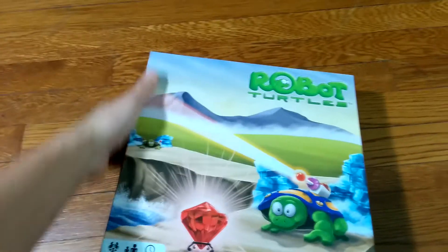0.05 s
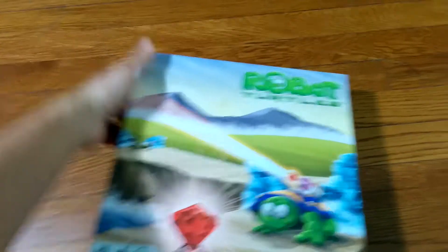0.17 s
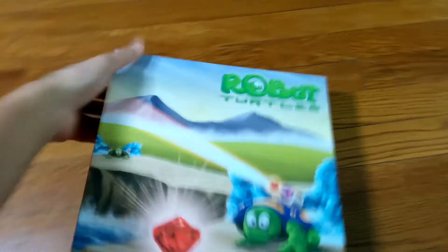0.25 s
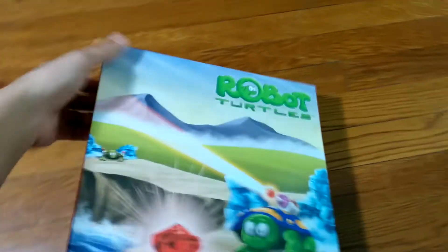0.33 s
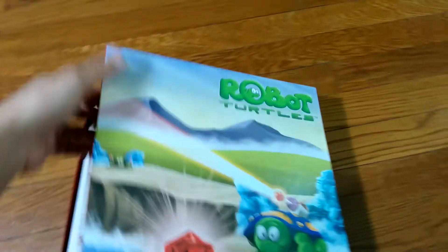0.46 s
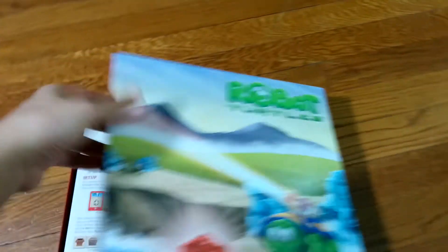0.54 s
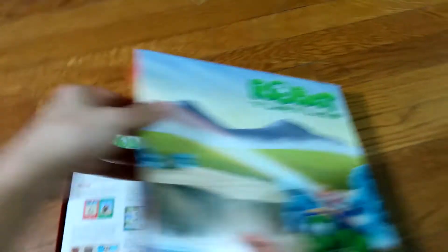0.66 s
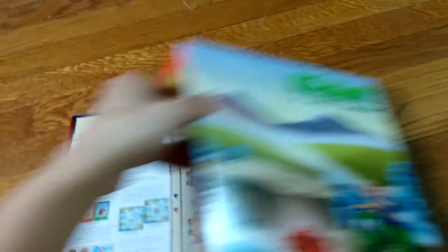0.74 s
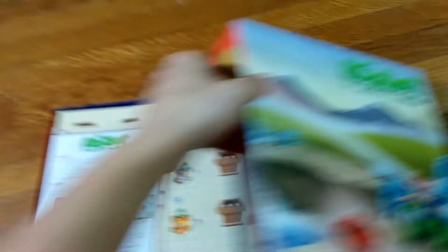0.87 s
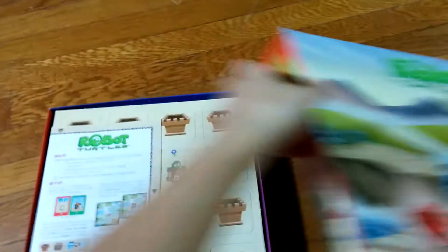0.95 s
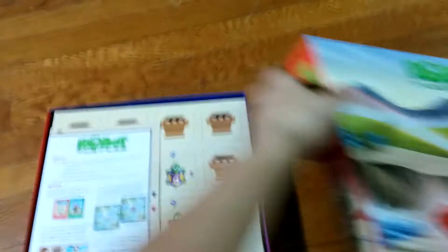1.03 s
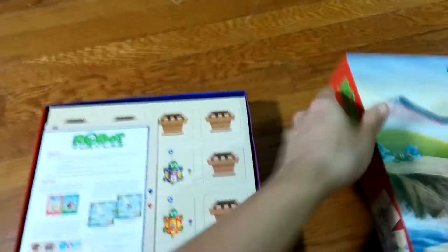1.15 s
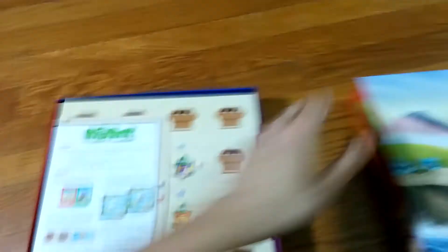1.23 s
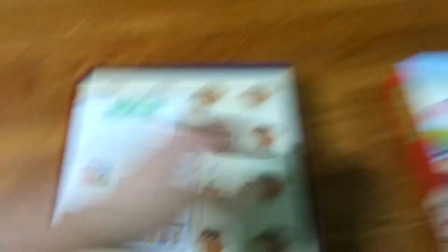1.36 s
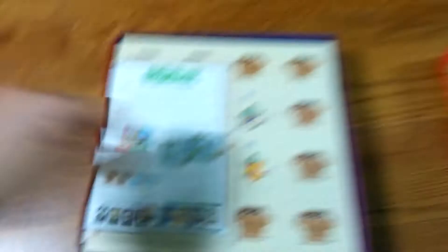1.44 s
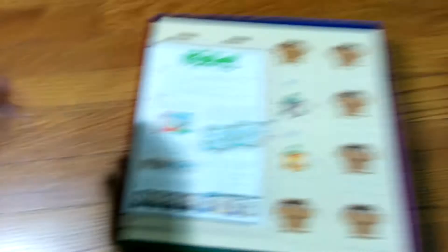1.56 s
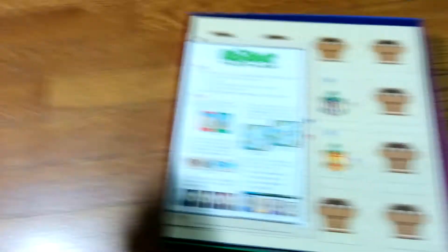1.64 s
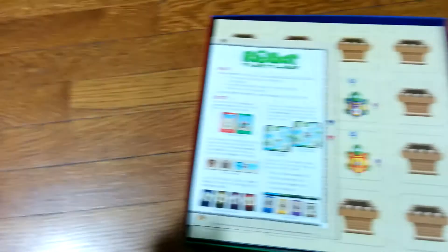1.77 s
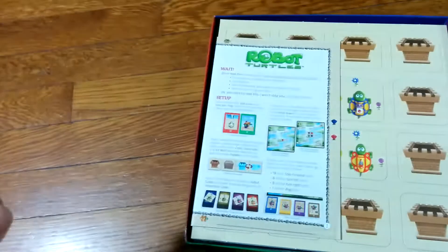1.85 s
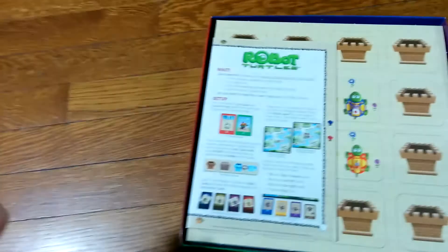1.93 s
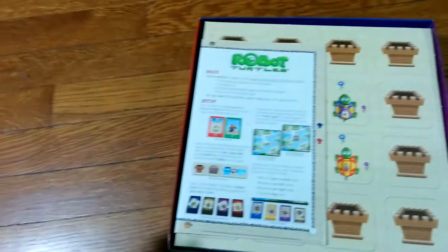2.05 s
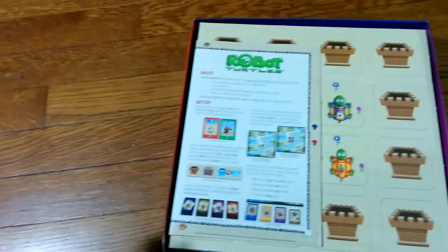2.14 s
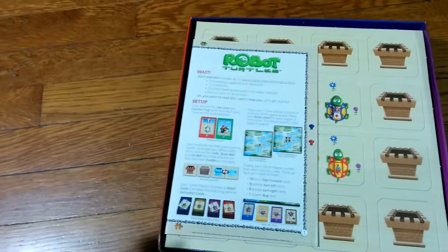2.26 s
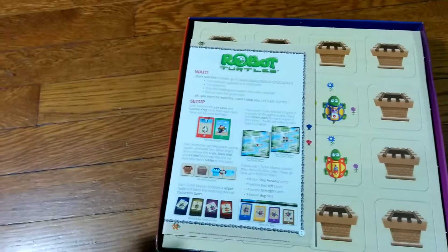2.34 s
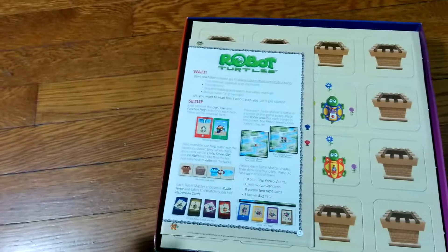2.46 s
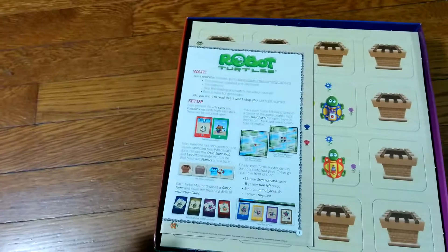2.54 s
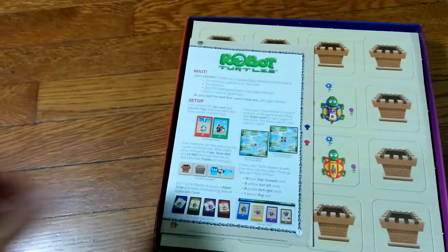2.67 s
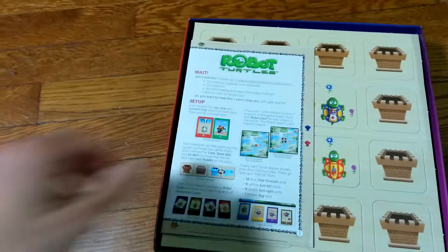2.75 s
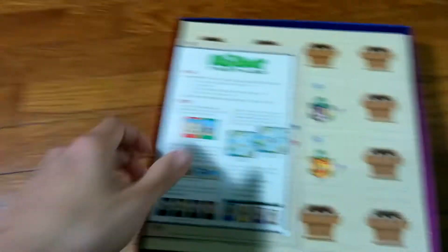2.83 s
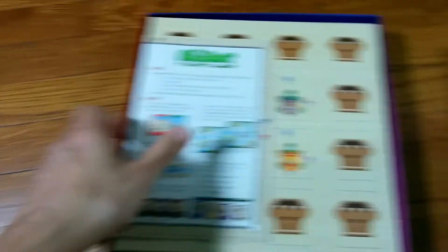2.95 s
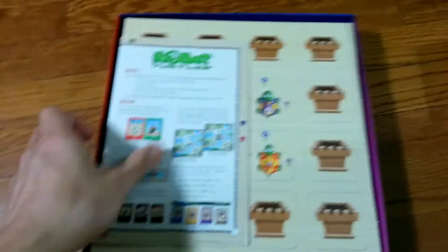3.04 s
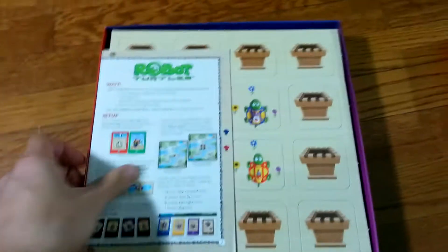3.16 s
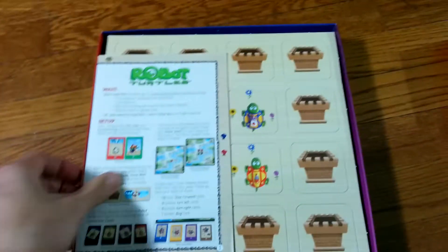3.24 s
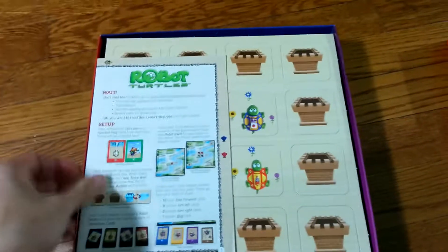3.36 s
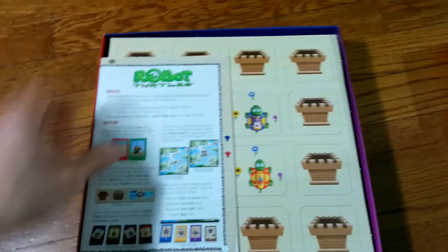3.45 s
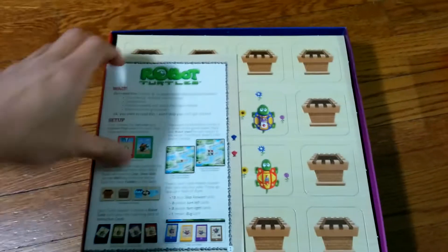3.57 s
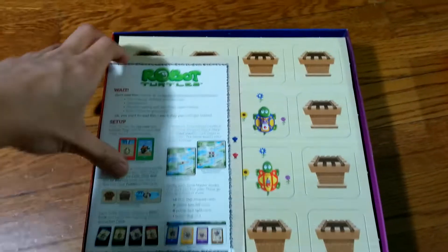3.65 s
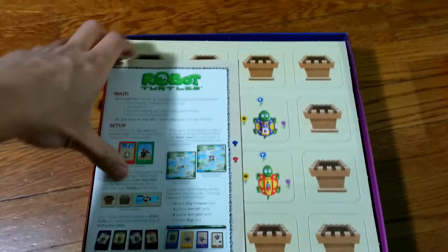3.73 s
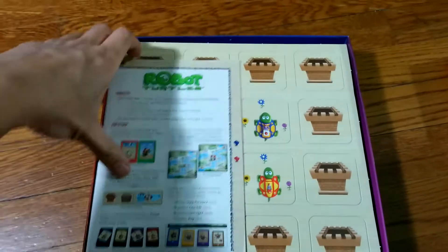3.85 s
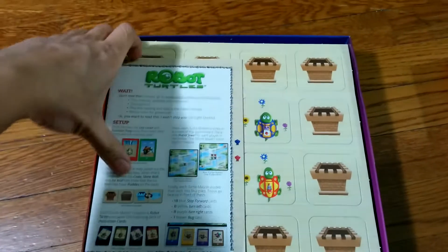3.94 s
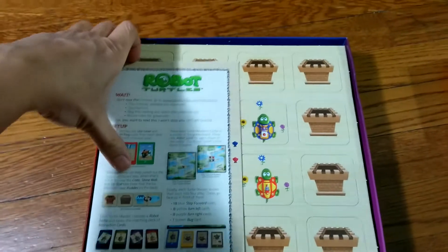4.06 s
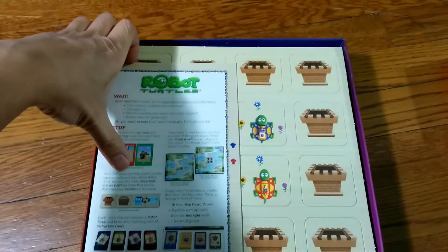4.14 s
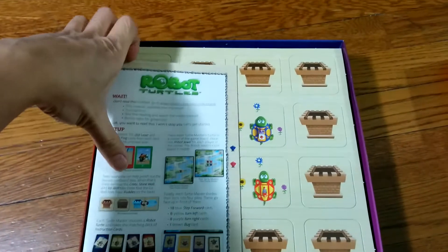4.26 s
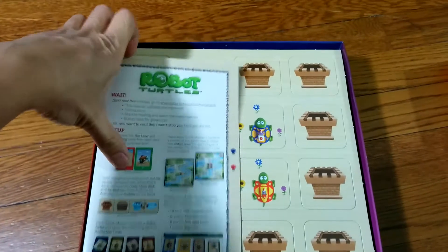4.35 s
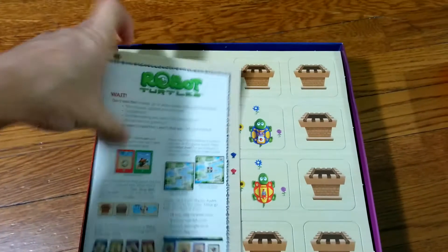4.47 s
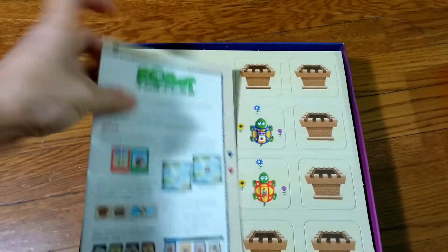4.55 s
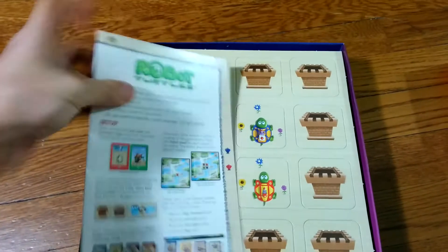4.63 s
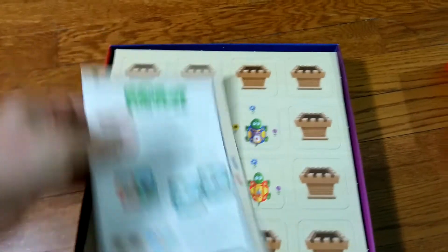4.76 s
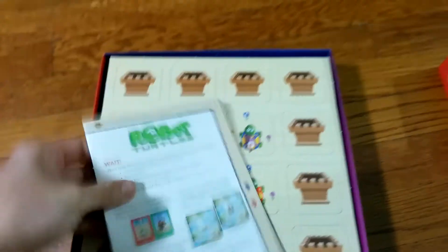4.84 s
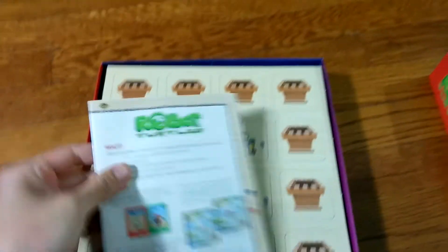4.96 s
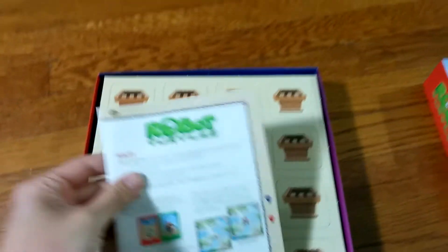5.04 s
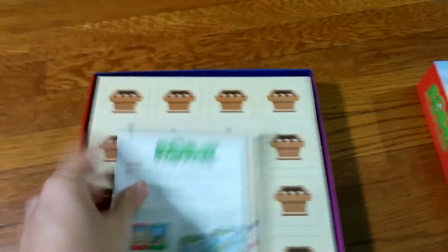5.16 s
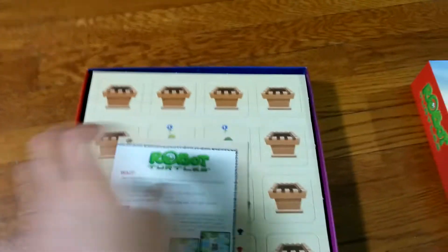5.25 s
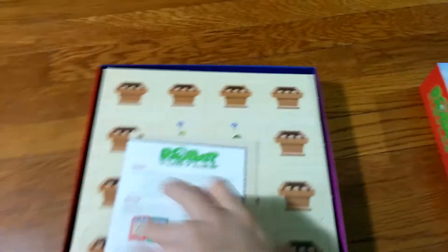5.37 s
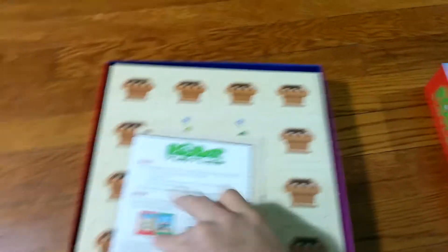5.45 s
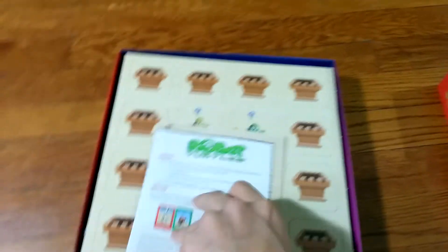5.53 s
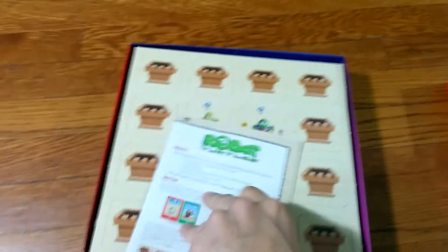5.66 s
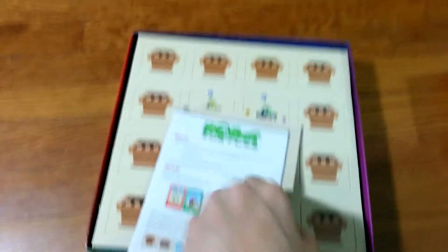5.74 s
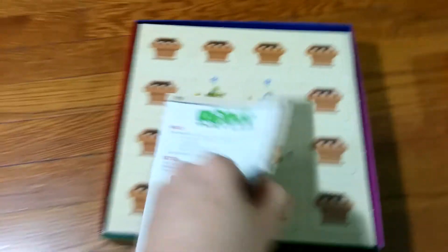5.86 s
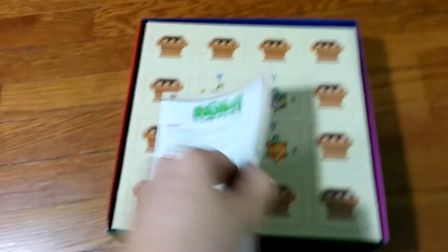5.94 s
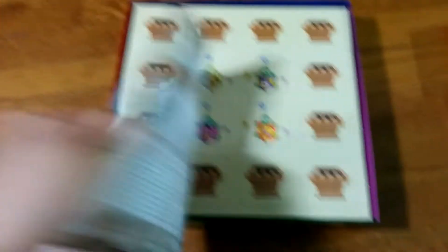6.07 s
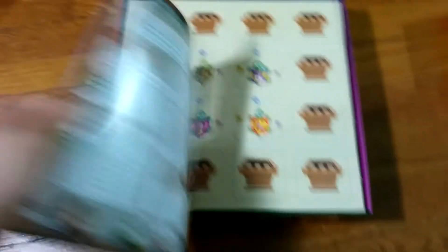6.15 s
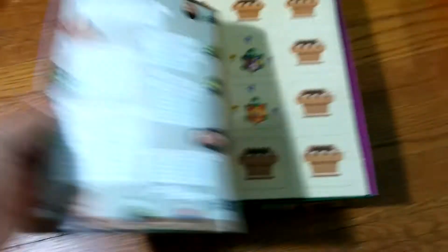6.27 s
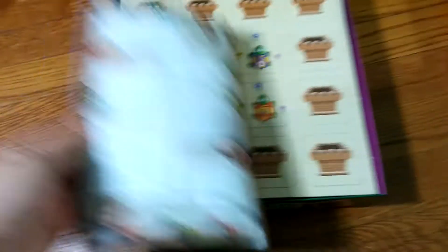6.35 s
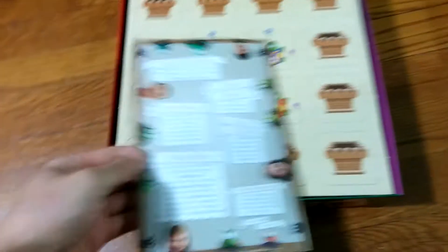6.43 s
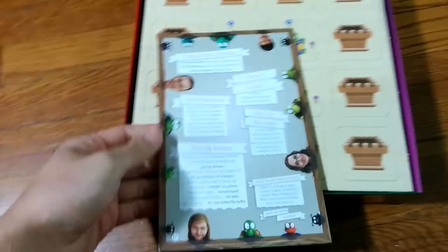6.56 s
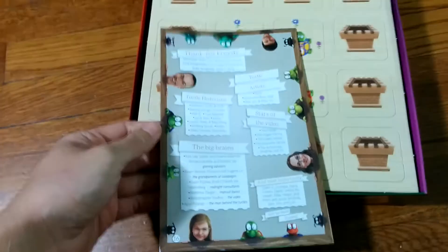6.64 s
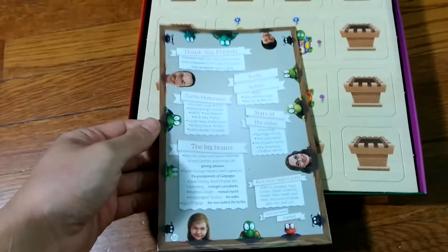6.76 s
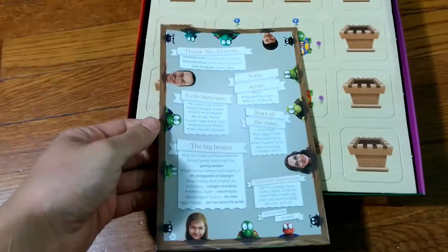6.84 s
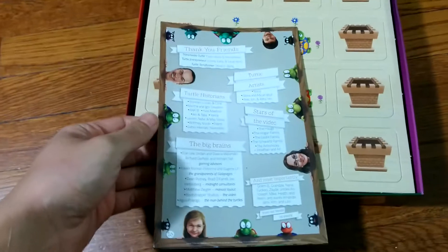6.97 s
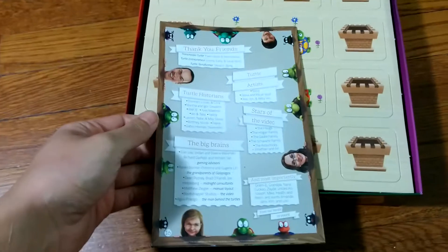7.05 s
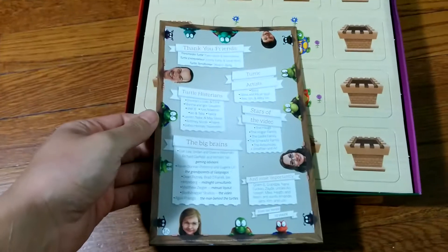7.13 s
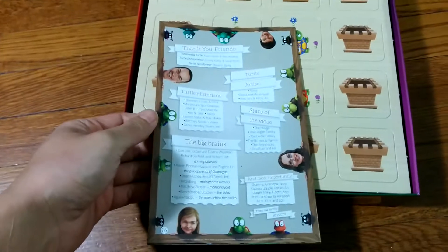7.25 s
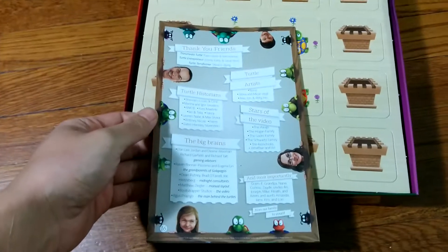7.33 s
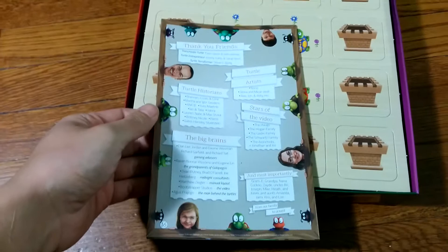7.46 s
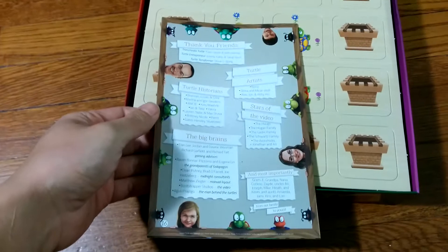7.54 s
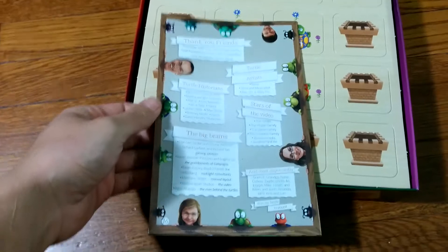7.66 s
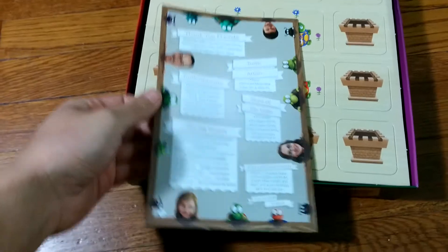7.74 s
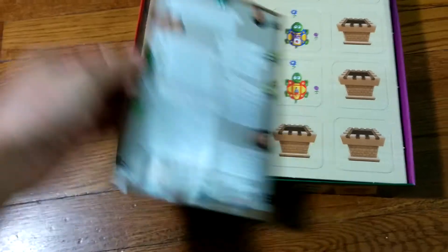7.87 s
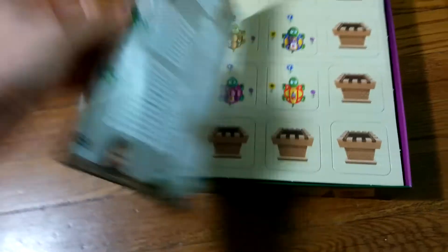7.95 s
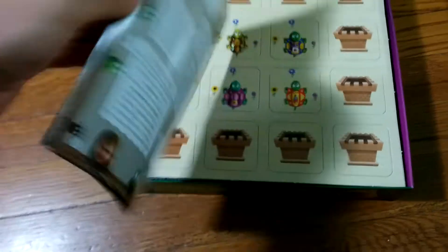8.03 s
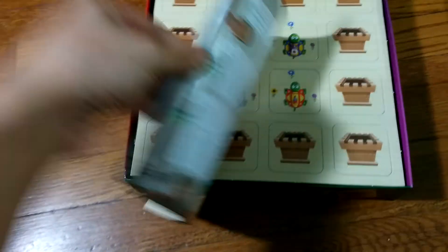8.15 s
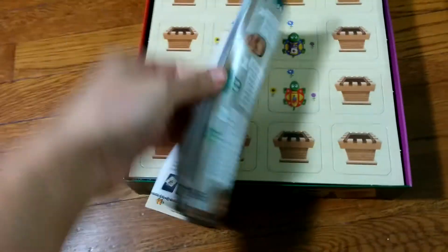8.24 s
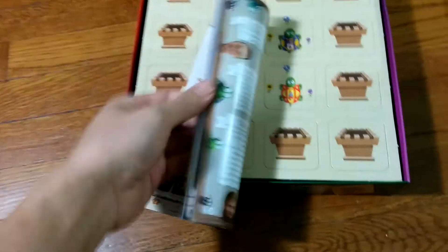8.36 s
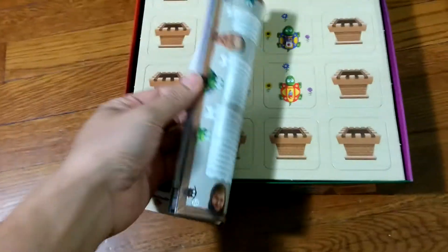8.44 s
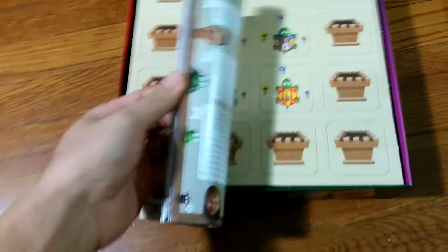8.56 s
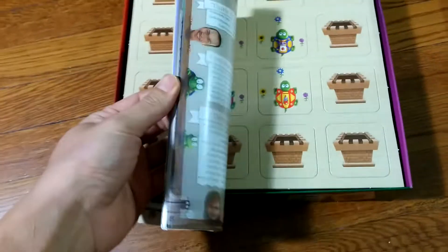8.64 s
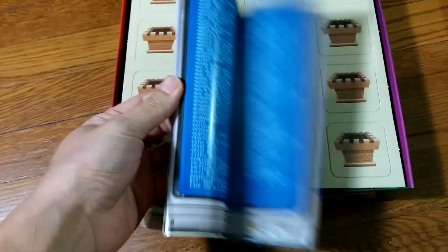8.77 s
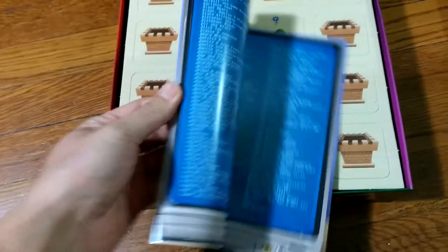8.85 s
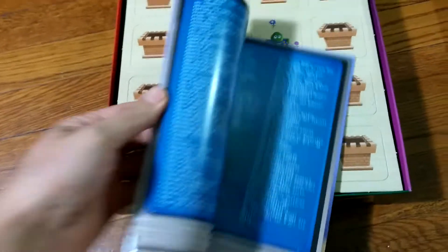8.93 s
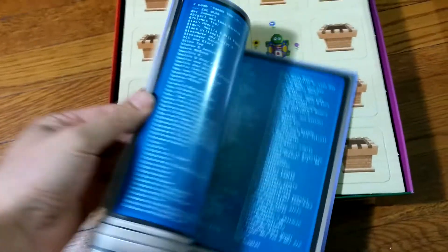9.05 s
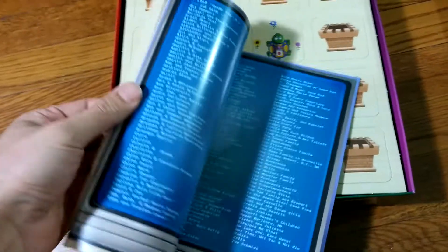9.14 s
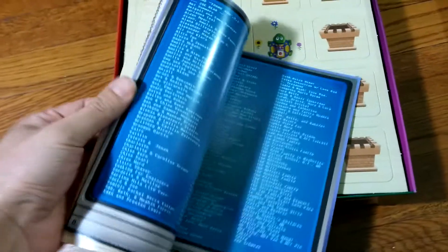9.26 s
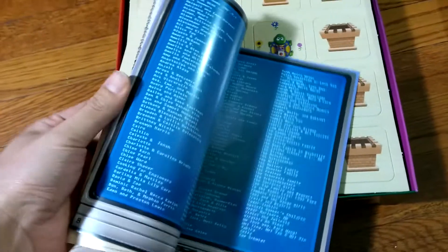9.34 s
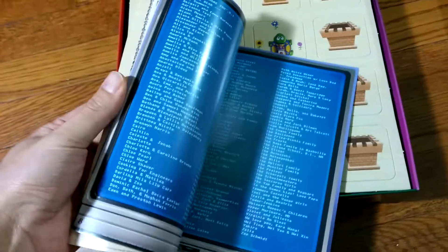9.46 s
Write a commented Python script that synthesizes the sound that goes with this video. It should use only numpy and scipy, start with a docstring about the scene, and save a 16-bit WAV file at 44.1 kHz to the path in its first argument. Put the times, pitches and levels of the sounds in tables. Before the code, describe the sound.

Hollow cardboard scraping and knocking, a burst of lid clatter, then light paper rustles, snaps and page flicks in a small quiet room.

```python
"""The lid of a cardboard game box scrapes off and clatters down on a wooden floor, in a small room.
Fingers knock on the boards inside; a glossy booklet is slid out, turned over and leafed through. Clothing swishes.
Knocks are noise cracks with ringing tones, rubbing is tiny clicks over hiss shaped by each stroke,
and singing card is a tone shaken by noise. Below lie a low noise rumble, a far gliding drone and a thin hiss."""
import sys
import numpy as np
from scipy import signal
from scipy.fft import rfft, irfft, next_fast_len
from scipy.io import wavfile
from scipy.ndimage import uniform_filter1d

SR = 44100
rng = np.random.default_rng(int(sys.argv[2]) if len(sys.argv) > 2 else 0)


def materialize(psi):
    """Save the field psi as 16-bit PCM at rate SR to the path in sys.argv[1].

    A 1-D psi becomes a single channel; in a 2-D psi each row is a channel.
    """
    bounded = np.clip(np.atleast_2d(psi).T, -1, 1)
    quanta = np.round(bounded * 32767).astype(np.int16)
    wavfile.write(sys.argv[1], SR, quanta)


N = 418950  # length in samples
T = np.arange(N) / SR  # time in seconds
TOP_HZ = 15900  # upper limit of the sound
STROKE_CURVE = 1.135  # exponent of a stroke's swell: higher is more pointed


def undb(db):
    """Turn decibels into gain."""
    return 10 ** (np.asarray(db) / 20)


def unit(x):
    """Scale to an rms level of 1."""
    return x / np.sqrt(np.mean(x ** 2))


def band(x, low_hz, high_hz, order=3):
    """Keep only the pitches between two edges, using no future samples."""
    edges = [low_hz, min(high_hz, .49 * SR)]
    return signal.sosfilt(signal.butter(order, edges, "band", fs=SR, output="sos"), x)


def colour(x, points):
    """Shape the spectrum of x with (pitch_hz, level_db) points, then scale to rms 1."""
    hz, db = np.transpose(points)
    f = np.maximum(np.fft.rfftfreq(len(x), 1 / SR), 1)
    gain = undb(np.interp(np.log(f), np.log(hz), db))
    return unit(irfft(rfft(x) * gain, len(x)))


def walk(rate_hz):
    """Wander smoothly and at random, with an rms of 1."""
    k = int(SR / rate_hz)
    steps = np.repeat(rng.standard_normal(N // k + 1), k)
    return unit(uniform_filter1d(steps, k)[:N])


def add(out, start_s, x):
    """Mix x into out at a given time."""
    i = max(int(start_s * SR), 0)
    out[i:i + len(x)] += x[:N - i]


def swell(length_s, rise):
    """A hand speeds up for a share of its stroke, then slows to rest."""
    rise = np.clip(rise, .03, .97)
    progress = np.linspace(0, 1, int(length_s * SR))
    speed = np.sin(np.pi / 2 * np.interp(progress, [0, rise, 1], [0, 1, 0]))
    return speed ** STROKE_CURVE


def friction(spectrum, catch_rate, catch_spread_db, smooth_db, uneven_db):
    """Fibres catch and let go as tiny clicks over a smooth hiss; the pressure is uneven."""
    happens = rng.random(N) < catch_rate / SR  # catch_rate is clicks per second
    sign = rng.choice([-1, 1], N)
    strength = undb(catch_spread_db * np.minimum(rng.exponential(size=N), 4))
    catches = unit(happens * sign * strength)
    hiss = undb(smooth_db) * rng.standard_normal(N)
    pressure = undb(uneven_db * walk(70))
    return colour((catches + hiss) * pressure, spectrum)


def grip(x, depth_db, spacing_hz):
    """Every new grip bends the sheet and gives it other resonances."""
    size = next_fast_len(len(x))
    f = np.fft.rfftfreq(size, 1 / SR)
    centres = spacing_hz * np.arange(200) ** 1.2  # further apart towards the treble
    heights = np.clip(rng.standard_normal(len(centres)), -2, 2)
    gain = undb(depth_db * np.interp(f, centres, heights))
    return irfft(rfft(x, size) * unit(gain), size)[:len(x)]


def rub(strokes, grain, split_hz, low_db, high_db, resonance_db, spacing_hz, treble_power=1.21):
    """Each stroke swells and fades; the bright hiss follows its speed more steeply than the low tones."""
    low = signal.sosfiltfilt(signal.butter(2, split_hz, fs=SR, output="sos"), grain)
    bass = undb(low_db) * unit(low)
    treble = undb(high_db) * unit(grain - low)
    out = np.zeros(N)
    for start_s, length_s, rise, level_db, bright_db in strokes:
        speed = swell(length_s, rise)
        now = (int(start_s * SR) + np.arange(len(speed))) % N
        stroke = speed * bass[now] + undb(bright_db) * speed ** treble_power * treble[now]
        add(out, start_s, undb(level_db) * grip(stroke, resonance_db, spacing_hz))
    return out


# Ranges of pitch in a blow, from low to high: thump, body, clack, snap
# columns: low_edge_hz, high_edge_hz
REGISTERS = [(130, 420), (420, 1100), (1100, 2800), (2800, 15000)]


def tilt(x, register_db):
    """Steer the first 1/60 s of a blow towards a given level in each register, with no sound ahead of it."""
    f = np.maximum(np.fft.rfftfreq(len(x), 1 / SR), 1)
    centres = np.log(REGISTERS).mean(1)
    for _ in range(2):
        now = [np.std(band(x[:SR // 60], low, high)) for low, high in REGISTERS]
        # folding the cepstrum (spectrum of the log gain) keeps the filter from acting early
        cepstrum = irfft(np.interp(np.log(f), centres, np.log(undb(register_db) / now)))
        cepstrum[1:len(x) // 2] *= 2
        cepstrum[len(x) // 2:] = 0
        x = irfft(rfft(x) * np.exp(rfft(cepstrum)))
    return x


def blows(table, modes, crack_db, crack_t60, flutter_db, flutter_t60, treble_damping, body_db,
          soft_hz, bass_hz, thin_hz, db):
    """Each blow is a short crack, the sheet's main ringing tones, and a dense flutter of noise."""
    out, t = np.zeros(N), np.arange(2 ** 14) / SR
    hz, mode_db, t60 = np.transpose(modes)[:, :, None]
    height = np.arange(len(REGISTERS)) - (len(REGISTERS) - 1) / 2
    middle, body = np.where(np.abs(height) < 1, .5, -.5), height == -.5
    for start_s, level_db, bright_db, hollow_db, ring in table:
        # a held sheet dies sooner than a free one; t60 is the time to fall by 60 dB
        fade = -np.log(1000) * t / max(ring, .1)
        # every blow lands elsewhere on the sheet and meets the tones in other shares
        share, detune = rng.standard_normal((2, len(modes), 1))
        weight = np.sign(share) * undb(mode_db + 2 * np.abs(share))
        waves = np.sin(2 * np.pi * hz * (1 + 0.0037 * detune) * t)
        tone = (weight * np.exp(fade / t60) * waves).sum(0)
        crack = undb(crack_db) * np.exp(fade / crack_t60) * rng.standard_normal(len(t))
        flutter = np.zeros(len(t))
        for k, edges in enumerate(REGISTERS):
            # treble_damping above 1 makes higher registers die sooner, below 1 later
            decay = np.exp(fade * treble_damping ** k / flutter_t60)
            flutter += band(rng.standard_normal(len(t)), *edges) * decay
        # soft fibres round off the top
        blow = band(tone + crack + undb(flutter_db) * flutter, bass_hz, soft_hz, order=1)
        # a thin sheet radiates little deep bass
        blow = band(blow, thin_hz, TOP_HZ, order=2)
        # a hard contact is bright; a blow on a free panel is hollow
        register_db = bright_db * height + hollow_db * middle + body_db * body
        add(out, start_s, undb(db + level_db) * tilt(blow, register_db))
    return out


# Strokes of the lid along the box walls
# columns: start_s, length_s, rise (share of the length spent speeding up),
# level_db (before tone shaping), bright_db (extra treble against bass)
LID_STROKES = [(0, 0.44, 0.05, -39.5, -8), (.2, 0.37, 0.44, -38, -10.5), (.45, 0.36, 0.63, -36.5, -3),
               (.76, 0.29, 0.31, -42.5, 0), (1.03, 0.25, 0.18, -45.5, 2)]
# Sound colour of rubbing cardboard; columns: pitch_hz, level_db (relative)
LID_COLOUR = [(120, -4), (200, 3.5), (340, -10), (440, -3), (763, -11), (1020, -4.5), (1370, -12.5),
              (2090, -10), (3370, -10.5), (3830, -11), (5940, -17.5), (12400, -26.5), (16000, -27)]


def lid_scrape():
    """Cardboard fibres catch and slip as the lid rubs along the box."""
    grain = friction(LID_COLOUR, catch_rate=700, catch_spread_db=1.6, smooth_db=-1, uneven_db=1.7)
    return rub(LID_STROKES, grain, split_hz=1900, low_db=1.0, high_db=-2, resonance_db=3.5, spacing_hz=40.4)


# Slow drift of the rumble; columns: time_s, level_db (before waver and lulls)
RUMBLE = [(0, -27.5), (.2, -36.5), (1.05, -35.5), (1.3, -30), (1.9, -33.5), (3.2, -34.5), (3.65, -40),
          (4, -33), (4.5, -38), (4.8, -36.5), (5.35, -44), (6.05, -34.5), (6.8, -43), (7.45, -36),
          (8.2, -40.5), (9.5, -42.5)]
# Sound colour of the rumble before its core is evened out; columns: pitch_hz, level_db (relative)
RUMBLE_COLOUR = [(25, -28.5), (40, -32.5), (50, -8), (55, 1.5), (63, -3.5), (74, -18.5), (85, -12),
                 (98, -17), (120, -13.5), (135, -31.5), (150, -27.5), (250, -41), (400, -44.5), (1500, -92)]
# The rumble sinks briefly; columns: middle_s, length_s, depth_db
LULLS = [(3.59, 0.15, 3.5), (4.137, 0.075, 15), (4.307, 0.076, 13.5), (5.43, 0.12, 9.5), (6.92, 0.099, 26),
         (7.34, 0.19, 11), (7.598, 0.11, 7.5), (9.41, 0.044, 16)]
# Sound colour of the steady hiss; columns: pitch_hz, level_db (relative)
HISS_COLOUR = [(120, -0.5), (200, 4), (311, -2), (366, -4), (548, -3.5), (709, -6), (3970, -12),
               (14600, -15.5), (16000, -23.5)]


def background(rumble_db=0, hiss_db=-54, core_hz=80, waver_db=1.88, waver_rate_hz=18):
    """A narrow low rumble of noise wavers and now and then sinks, under a steady hiss."""
    low = colour(rng.standard_normal(N), RUMBLE_COLOUR)
    core = signal.sosfiltfilt(signal.butter(3, core_hz, fs=SR, output="sos"), low)
    # the deep core wanders in pitch while its strength holds
    window = SR // 25
    strength = np.sqrt(uniform_filter1d(uniform_filter1d(core ** 2, window), window))
    rumble = core / strength + low - core
    level_db = np.interp(T, *np.transpose(RUMBLE)) + waver_db * walk(waver_rate_hz)
    for middle_s, length_s, depth_db in LULLS:
        dip = signal.windows.tukey(int(length_s * SR), .7)
        add(level_db, middle_s - length_s / 2, -depth_db * dip)
    hiss = colour(rng.standard_normal(N), HISS_COLOUR)
    return undb(rumble_db + level_db) * rumble + undb(hiss_db) * hiss


# A faint far drone, probably an engine outside, climbs and fades
# columns: time_s, pitch_hz, level_db (before waver)
DRONE = [(0, 104, -47), (1, 109, -43.5), (1.6, 113, -37), (2, 123, -45), (2.8, 125, -44), (3.2, 129, -47.5),
         (3.7, 132, -53), (4.1, 132, -73)]


def drone(waver_db=2):
    """One low sine tone glides in pitch and wavers in level."""
    time_s, hz, db = np.transpose(DRONE)
    phase = 2 * np.pi * np.cumsum(np.interp(T, time_s, hz)) / SR
    return undb(np.interp(T, time_s, db) + waver_db * walk(14)) * np.sin(phase)


# The lid is tugged loose and dropped
# columns: start_s, level_db (before the layer's gain), bright_db (per register),
# hollow_db (middle registers over edges), ring (factor on ringing time, at least 0.1)
LID_KNOCKS = [(.004, -29, -6, -0.5, 0.57), (.123, -32, -3.5, 4, 0.45), (.268, -27, -1.5, 6, .95),
              (.287, -26, -5, -2, 0.92), (.315, -14, -4.5, 8.5, 0.55), (.336, -29.5, -12.5, 3, 0.61),
              (.369, -29.5, 1, 12.5, .35), (.493, -35, -4, 1, 1), (.601, -21, -6.2, 8.5, 0.44),
              (.643, -33.5, -14.5, 20.5, 0.76), (.659, -37, -6, 5, 1), (1.008, -32.5, -3.5, 1.5, 1),
              (1.033, -22, -3, 6, 0.59), (1.039, -29.5, -8, 6, 0.27), (1.153, -33.5, -5, 1.5, 0.44),
              (1.2015, -12.5, -5, 16.5, 0.35), (1.255, -12.5, -5, 6.5, 0.59), (1.281, -17, -9, 9, 0.59),
              (1.3, -16.5, -11, 6.5, 0.95), (1.32, -21, -5.5, 5, 0.94), (1.33, -28, -12, -2, 0.62),
              (1.345, -26, -8, 17, 0.54)]
# Ringing tones of the empty lid, before each blow varies them; columns: pitch_hz, level_db, t60_s
LID_MODES = [(198.1, -3.5, 0.32), (262, -5, 0.23), (364.3, 2, 0.29), (425, 0.5, 0.21), (482.6, 8, 0.17),
             (585, -7, 0.25), (600, -2.5, 0.15), (643, -4, 0.11), (709, -5.5, 0.27), (803, -12, 0.14),
             (880, -3, 0.2), (990, 0.5, 0.13), (1122, -4, 0.094), (1223, -9.5, 0.33), (1320, 2, 0.061),
             (1520, -27, 0.16), (2055, -2, 0.086), (3985, 2, 0.091)]


def lid_knocks():
    """The empty lid rings as a light box when it is struck."""
    return blows(LID_KNOCKS, LID_MODES, crack_db=18, crack_t60=0.053, flutter_db=12.5, flutter_t60=0.25,
                 treble_damping=1.09, body_db=1.0, soft_hz=1800, bass_hz=300, thin_hz=200, db=-7.5)


# Card and glossy paper sing as they drag
# columns: start_s, length_s, pitch_hz, width_hz, level_db (before the fades),
# glide (end pitch over start pitch)
DRAGS = [(0.622, 0.11, 2110, 450, -37, 0.96), (0.638, 0.14, 4330, 1600, -42, 1),
         (0.782, 0.14, 2910, 359, -50, 0.9), (0.793, 0.17, 3760, 400, -49, 1.1),
         (2.919, 0.17, 940, 447, -48, 0.89), (3.205, 0.19, 969, 510, -43.5, 0.85),
         (3.615, 0.12, 3360, 298, -52, 0.97), (4.679, 0.3, 3430, 600, -47.5, 0.95),
         (5.076, 0.15, 4140, 1600, -43.5, .95), (7.868, 0.26, 11600, 1200, -55.5, 0.99),
         (8.069, 0.054, 1996, 260, -43.5, 0.86), (8.065, 0.068, 4180, 300, -51.5, 0.89),
         (8.19, 0.17, 5370, 600, -47.5, 1.1), (8.194, 0.176, 6460, 900, -50, 1.2),
         (8.206, 0.17, 2260, 400, -47.5, 1.1), (8.437, 0.15, 5400, 500, -51.5, 0.96),
         (8.441, .14, 6420, 800, -51, 1.05), (8.456, .13, 3080, 400, -51, 0.93)]


def drags():
    """Rapid stick-slip gathers the rubbing into a narrow band that swells, glides and fades."""
    out = np.zeros(N)
    for start_s, length_s, hz, width_hz, level_db, glide in DRAGS:
        n = int(length_s * SR)
        slips = band(rng.standard_normal(SR), 12, width_hz / 2, order=2)[:n]
        phase = 2 * np.pi * np.cumsum(np.geomspace(hz, hz * glide, n)) / SR
        song = unit(slips * np.sin(phase)) * signal.windows.tukey(n, .7)
        add(out, start_s, undb(level_db) * song)
    return out


# A bowed sheet pops through and rings at its own pitch
# columns: start_s, pitch_hz, level_db, t60_s (time to fall by 60 dB)
POPS = [(1.153, 1920, -29, 0.045), (4.366, 2120, -41, 0.03), (4.446, 1520, -24.5, 0.031),
        (4.472, 1550, -26.5, 0.031), (5.012, 1935, -32, 0.026), (6.422, 2410, -23, 0.044),
        (8.137, 1710, -20.5, 0.041), (8.157, 271, -10, 0.093)]


def pops():
    """Each sheet that pops through gives one quickly damped sine tone."""
    out, t = np.zeros(N), np.arange(SR // 4) / SR
    for start_s, hz, level_db, t60 in POPS:
        add(out, start_s, undb(level_db - 60 * t / t60) * np.sin(2 * np.pi * hz * t))
    return out


# Clothing swishes with the arm
# columns: start_s, length_s, rise (share of the length spent speeding up), level_db (before the layer's gain)
SWISHES = [(1.494, 0.36, 0.53, -45.5), (2.606, 0.6, 0.27, -46), (3.12, 0.28, 0.69, -55),
           (3.384, 0.043, 0.61, -48), (3.463, 0.076, 0.5, -45.5), (7.837, 0.33, 0.28, -51.5)]
# Sound colour of rubbing cloth; columns: pitch_hz, level_db (relative)
SWISH_COLOUR = [(590, -7), (1000, -5.5), (1400, -11), (1960, -8), (3080, -2.5), (3670, -5.5), (7270, -2),
                (14800, -11), (16000, -24)]


def clothing(db=-1):
    """Fine cloth rubs almost without grain, following the speed of the arm."""
    motion = np.zeros(N)
    for start_s, length_s, rise, level_db in SWISHES:
        add(motion, start_s, undb(level_db) * swell(length_s, rise))
    grain = friction(SWISH_COLOUR, catch_rate=5000, catch_spread_db=1.5, smooth_db=4.4, uneven_db=0.27)
    return undb(db) * motion * grain


# Fingers and booklet bump the filled box
# columns: start_s, level_db (before the layer's gain), bright_db (per register),
# hollow_db (middle registers over edges), ring (factor on ringing time)
BOX_KNOCKS = [(2.906, -33, -2.5, 4, 1), (3.139, -37, -0.4, 2, 1), (3.184, -27, -2, 11, 0.54),
              (3.23, -32, -5.5, 6, 0.51), (3.369, -45.5, -4, 4, 1), (3.671, -32.5, -7.5, -4, .67),
              (7.883, -50, -9.5, 7, .6)]
# Ringing tones of the filled box, before each blow varies them; columns: pitch_hz, level_db, t60_s
BOX_MODES = [(179, 2.5, 0.14), (274, 5.5, 0.11), (443, -13, 0.23), (539, -14.5, 0.34), (723, -6.5, 0.15),
             (901, 1, 0.14), (1007, -4.5, 0.21), (1107, -8, 0.23), (1370, -32, 0.079), (2005, 10, 0.055)]


def box_knocks():
    """The filled box gives a short crack and a few ringing tones when it is bumped."""
    return blows(BOX_KNOCKS, BOX_MODES, crack_db=24.0, crack_t60=0.023, flutter_db=14.0, flutter_t60=0.18,
                 treble_damping=0.95, body_db=3, soft_hz=1820, bass_hz=160, thin_hz=140, db=-4.5)


# Paper rubs on paper and card: fingers feel for the booklet's edge, it is lifted out and laid down,
# pushed along the boards and turned over, then bent so the pages slide off the thumb
# columns: start_s, length_s, rise (share of the length spent speeding up),
# level_db (before tone shaping), bright_db (extra treble against bass)
PAGE_STROKES = [ (3.78, 0.084, 0.58, -45, -15), (3.855, 0.098, 0.31, -46, -7),
                (3.97, 0.15, 0.95, -57.5, 0.5), (4.47, 0.34, 0.052, -62.5, 13.5),
                (4.7, 0.19, 0.06, -40, -1.5), (4.77, 0.28, 0.25, -50, 10), (5, 0.086, 0.14, -57, 5),
                (5.085, 0.1, 0.12, -42.5, -1), (5.13, 0.15, 0.92, -44, 7), (5.27, 0.096, .2, -64.5, 14.5),
                (5.462, 0.052, 0.13, -39.5, -7), (5.485, .085, .55, -45, 4.5),
                (5.56, 0.13, 0.34, -46, -0.5), (5.68, 0.11, 0.47, -45, -0.5), (5.76, .22, 0.73, -45.5, 4.5),
                (5.96, 0.12, 0.29, -47.5, 6), (6.04, 0.2, 0.58, -47.5, 7.5), (6.235, 0.05, 0.54, -45.5, -3),
                (7.62, 0.33, 0.26, -59, 3), (7.85, 0.28, 0.16, -54.5, 4), (8.05, 0.13, 0.43, -53, 0),
                (8.17, .21, 0.38, -47.5, 7), (8.42, 0.15, 0.65, -44, -2), (8.675, 0.033, 0.96, -37, 1),
                (8.715, .05, 0.23, -44.5, 1), (8.825, 0.077, 0.13, -37, -4), (8.88, 0.25, 0.59, -40.5, 0.5),
                (9.06, .17, 0.24, -49, 8), (9.26, 0.11, 1, -52, -14)]
# Sound colour of rubbing paper; columns: pitch_hz, level_db (relative)
PAGE_COLOUR = [(120, -9), (200, -7.5), (283, -1), (579, -11), (635, -3.5), (867, -5), (1000, -1),
               (1400, -9), (1740, -2), (2800, -4.5), (3370, -1.5), (6520, -6), (9400, -15), (15100, -16),
               (16000, -23)]


def page_slide():
    """Paper fibres catch and slip as the booklet and its pages slide."""
    grain = friction(PAGE_COLOUR, catch_rate=900, catch_spread_db=1.43, smooth_db=0.12, uneven_db=1.67)
    return rub(PAGE_STROKES, grain, split_hz=2070, low_db=-1.5, high_db=-1.5,
               resonance_db=3.5, spacing_hz=70.4)


# Pages buckle, flick and slap
# columns: start_s, level_db (before the layer's gain), bright_db (per register),
# hollow_db (middle registers over edges), ring (factor on ringing time)
PAGE_SNAPS = [(4.366, -53, 8, 6, 0.69), (4.448, -40.5, 6.5, 12, 0.63), (4.474, -30.5, 6, 3, 0.18),
              (4.721, -40.5, -6.5, 15, 1.5), (4.859, -29, 3.5, 8, 0.26), (5.013, -42.5, 0.5, 1.5, 0.51),
              (5.092, -41.5, -3.5, 5, 1.3), (5.197, -34, -0.5, 2, 0.27), (5.234, -35, 2, 9, 0.81),
              (5.246, -34, -1.5, 3.5, .55), (5.254, -39, -8, 13, 0.84), (6.156, -27.5, 1.1, 10, 1),
              (6.191, -40.5, -1.5, 21, 1.2), (6.39, -35.5, -1.5, 15, 1), (6.406, -38.5, 3.5, 11, 1.2),
              (6.42, -22, -3.5, 12.5, 0.74), (6.563, -42, -1.8, -0.5, 1.2), (7.805, -46.5, -6, 5.5, 0.71),
              (8.135, -29, -4, 1, 1), (8.153, -18.5, -3.5, 7, 0.73), (8.684, -42.5, 9.5, 8, 0.61),
              (8.698, -42.5, 3.5, 11.5, .65), (8.727, -55, 5, 11, .8), (8.78, -36.5, 1, 6, 0.8),
              (8.801, -35, 1.5, -0.5, 3.6), (8.823, -21.5, 2.5, 2, 0.67)]
# Ringing tones of the booklet, before each blow varies them; columns: pitch_hz, level_db, t60_s
PAGE_MODES = [(182, 1, 0.11), (283, 8, 0.032), (349.6, -2, 0.097), (524, 5, 0.013), (837, -11, 0.05),
              (957, -9, 0.078), (1134, -34, 0.077), (1696, -20, 0.024), (1770, -27, 0.094),
              (2220, 11, 0.041)]


def page_snaps():
    """Thin pages give a very short crack with a bright flutter."""
    return blows(PAGE_SNAPS, PAGE_MODES, crack_db=24.5, crack_t60=0.01, flutter_db=19, flutter_t60=0.099,
                 treble_damping=1.05, body_db=-3.5, soft_hz=8090, bass_hz=250, thin_hz=170, db=-8.5)


def room(x, wet_db=-18, t60=0.29, top_hz=4500):
    """A furnished room answers with a short dull tail of fading noise."""
    t = np.arange(SR // 2) / SR
    noise = band(rng.standard_normal(len(t)), 70, top_hz, order=1)
    tail = noise * np.exp(-np.log(1000) * t / t60) * (t > .006)  # starts after 6 ms
    return x + undb(wet_db) * signal.fftconvolve(x, tail / np.linalg.norm(tail))[:N]


def scene():
    """Put lid, box, booklet and clothing in the room, then add pops, rumble, hiss and drone."""
    knocks = lid_knocks() + box_knocks() + page_snaps()
    rubbing = lid_scrape() + page_slide() + drags() + clothing()
    return (room(knocks + rubbing) + pops() + background() + drone())[None]


def record(dry, gate_db=-42, slope=1.0, ceiling=0.6):
    """A noise suppressor ducks the quietest moments; the loudest peaks are rounded and the top is cut."""
    envelope = np.sqrt(uniform_filter1d(dry ** 2, SR // 40) + 1e-12)
    ducked = dry * np.minimum(envelope / undb(gate_db), 1) ** slope
    rounded = ceiling * np.tanh(ducked / ceiling)
    return signal.sosfilt(signal.ellip(10, .2, 80, TOP_HZ, fs=SR, output="sos"), rounded)


dry = scene()
out = record(dry)
materialize(out)
```